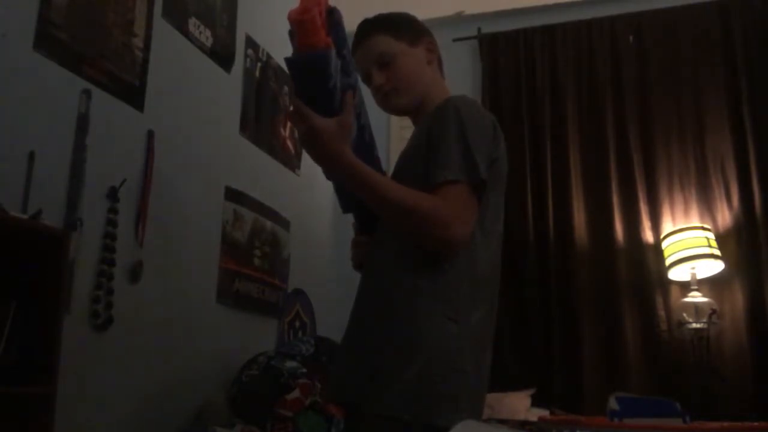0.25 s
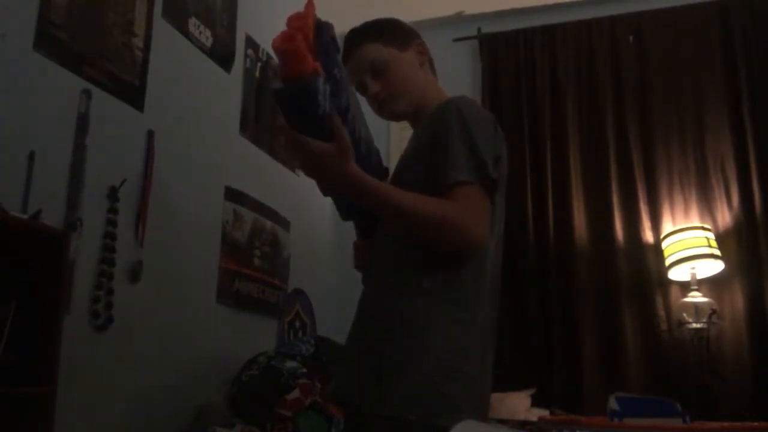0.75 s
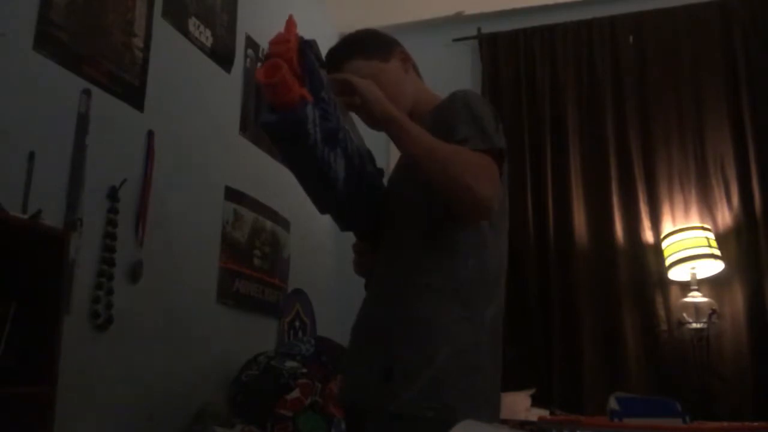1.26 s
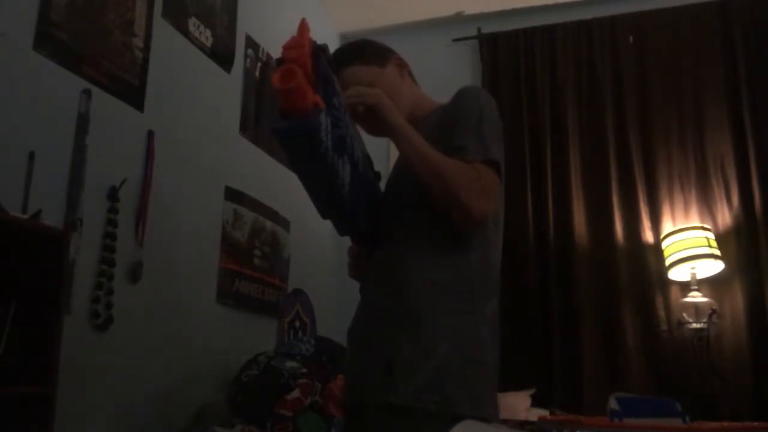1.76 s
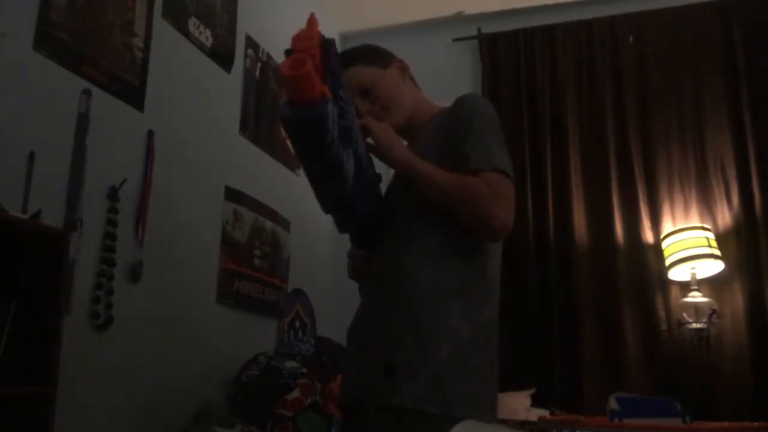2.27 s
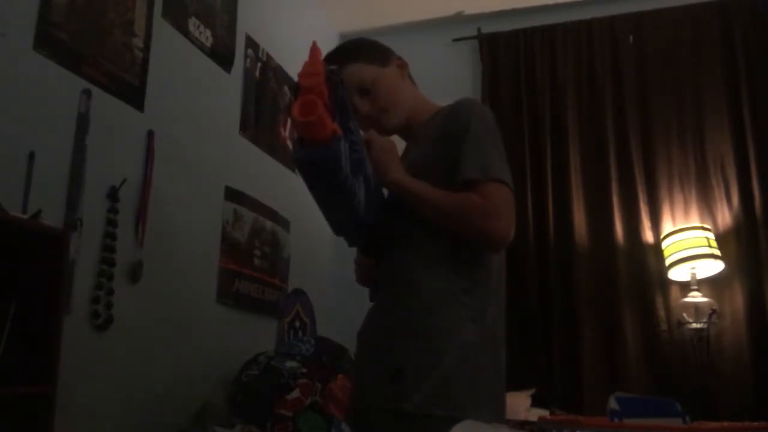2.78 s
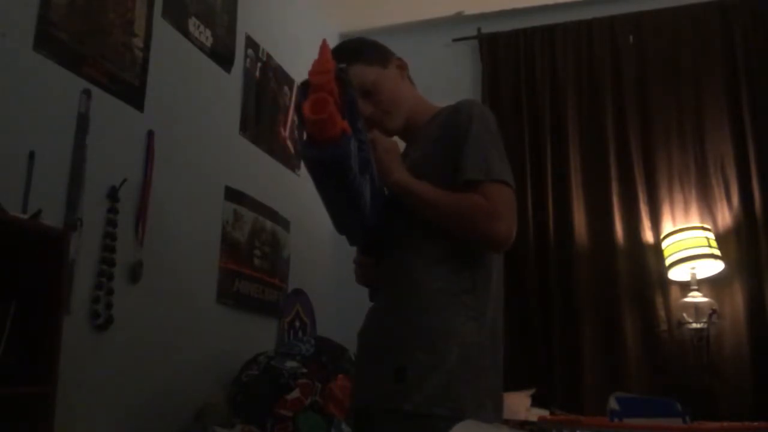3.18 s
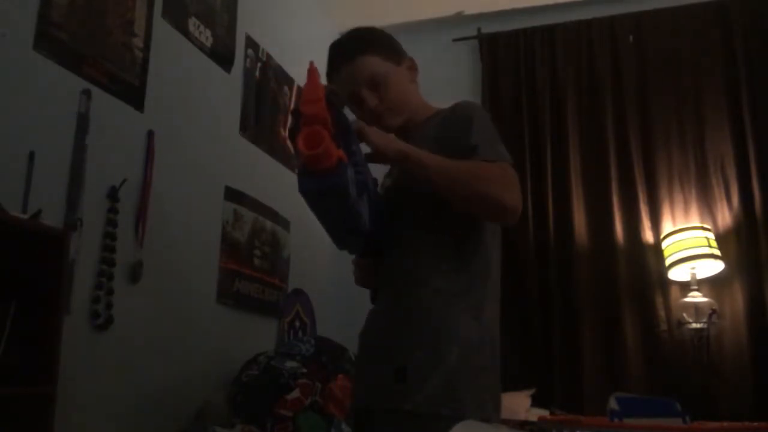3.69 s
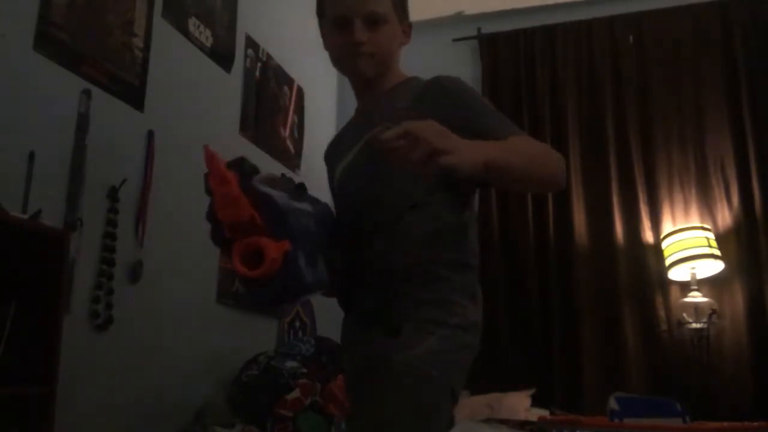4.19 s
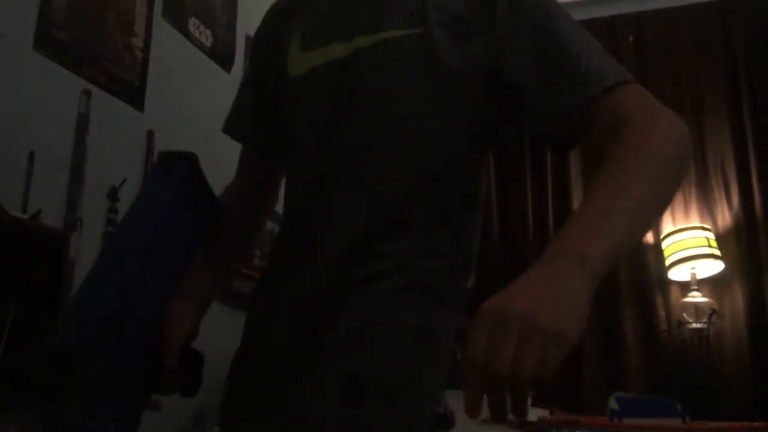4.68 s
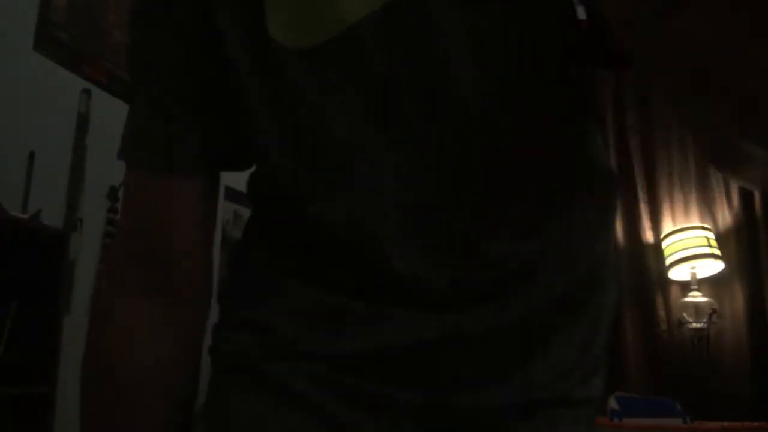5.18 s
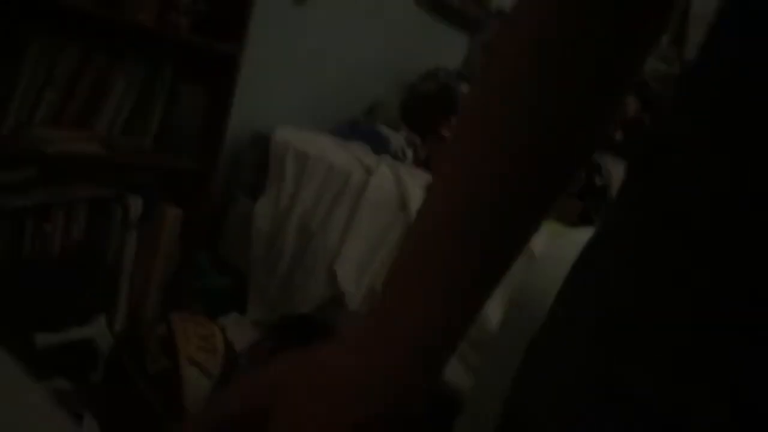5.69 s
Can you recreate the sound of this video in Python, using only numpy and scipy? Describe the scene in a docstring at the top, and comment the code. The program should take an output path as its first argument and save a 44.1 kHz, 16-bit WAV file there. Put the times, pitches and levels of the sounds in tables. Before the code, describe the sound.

A quiet bedroom opens with faint, muffled hiss, which brightens and gains a low hum at about 0.7 seconds. Soft ticks and rubbing follow as a plastic toy blaster is handled, then a sharp click at 1.8 seconds. Around 2 seconds its battery motor starts amid more clicks, rising in a hissy, whirring whine that swells by 2.5 seconds. A loud clack lands at 2.7 seconds, and gears grind with a fast throb from about 2.6 to 3.3 seconds. The power then cuts and the whine slowly falls in pitch, fading until about 5.5 seconds. Plastic knocks and soft footfalls on floorboards come near 4.3 seconds, with light rubbing and further knocks around 5.2 seconds. From 5.5 seconds a hand grips the microphone with loud, close, creaking snaps, then rustles and bumps it several times just before 5.9 seconds.

```python
"""Two flywheel motors in a battery toy blaster spin up and coast down in a quiet bedroom. Their whine is
a harmonic series on each shaft speed, joined by brush hiss, wheel roar and a loaded gear grinding.
Knocks and rubbing excite the resonances of the plastic shell, and feet shift on the floor boards.
At the end a hand creaks on a nearby camera by stick-slip friction, then bumps it.
Background hiss lies beneath; at first the sound is muffled, then the treble and a low hum enter."""
import sys
import numpy as np
from scipy import signal
from scipy.fft import rfft, irfft, next_fast_len
from scipy.io import wavfile
from scipy.ndimage import uniform_filter1d

SR = 44100
rng = np.random.default_rng(int(sys.argv[2]) if len(sys.argv) > 2 else 0)


def output_pcm(signal):
    """Save a mono or channel-first signal as 16-bit PCM at the path in sys.argv[1].

    Samples are clipped to [-1, 1] before scaling.
    """
    pcm = np.clip(np.atleast_2d(signal).T, -1, 1) * 32767
    wavfile.write(sys.argv[1], SR, np.round(pcm).astype(np.int16))


N = 262306
T = np.arange(N) / SR

# shaft harmonics: multiple of shaft speed, level/dB, slope/(dB per doubling of speed)
SHAFT_ORDERS = [(1, 5.5, 0.5), (2, -8, -5), (3, -0.5, 2), (4, -6.5, -0.5), (5, -11, -3), (6, -15, -1.5),
                (7, -7, 4), (9, -1, 7)]
# spectra of the brush hiss and the wheel roar: f/Hz, level/dB
HISS_SPECTRUM = [(1180, 5), (2000, 2.5), (2780, -10.5), (3280, -14), (4730, -2.5), (6420, -6), (9660, -4),
                 (10500, -4), (16000, 2)]
ROAR_SPECTRUM = [(150, -16), (250, -14), (382, -23), (450, -5), (595, 4.5), (1060, 4.5), (1210, 5.5),
                 (2500, -11.5), (3250, -37), (5500, -120)]
# resonances of the motor cans and the plastic shell: f/Hz, bandwidth/Hz, level/dB
CAN_MODES = [(3280, 400, -6), (4200, 600, -8), (5200, 350, -1), (6250, 500, 0), (7000, 600, -4),
             (9000, 1600, -11)]
SHELL_MODES = [(181.4, 80, -9), (280, 95, -3), (524, 145, 6), (659, 137, 7.5), (937, 257, 0.5),
               (1260, 220, 2.5), (1521, 233, -0.5), (2090, 250, -3), (2960, 540, -6.5), (4150, 610, -6),
               (5340, 170, -17), (6775, 460, -4.5), (6720, 830, -5.5), (8250, 1100, -68)]
# motor gain as the blaster is turned and carried: t/s, level/dB
CARRY_GAIN = [(2.2, -19), (2.45, -3.5), (2.8, 1.5), (3.3, -1.5), (4.3, -1), (4.75, -4), (5.05, -7),
              (5.45, -7)]
# knocks on the shell: t/s, level/dB, tilt/(dB per octave), rattle/dB, rattle length/s, thud/dB
SHELL_KNOCKS = [(0.766, -37.5, 0.5, -1, 0.019, -30), (0.829, -34, 7, -23, 0.019, -28),
                (0.91, -49, -1.5, -11, 0.052, -30), (1.035, -46, -1.5, -18, 0.028, -30),
                (1.07, -43, 0.6, -13, 0.061, -32), (1.131, -40, -0.2, -12, 0.018, -30),
                (1.326, -36, -3, -8.5, 0.03, -3), (1.513, -44.5, -4.5, -22, 0.018, -33),
                (1.627, -35, -14.5, -12.5, 0.02, -5), (1.771, -31, -6.5, 3, 0.077, -28),
                (1.783, -8.5, 2, 1, 0.012, -13.5), (1.961, -17, -3.5, 4.5, 0.054, -13),
                (2.142, -27.5, -2.5, 10, 0.027, -37), (2.159, -18, -2.5, -6, 0.025, -40),
                (2.228, -29.5, -2.5, -17, 0.034, -34), (2.305, -38, 2.5, -15, 0.011, -27),
                (2.377, -21, 2, -28, 0.014, -35), (2.483, -36.5, 0, -10, 0.013, -36),
                (2.59, -29.5, 0, -1, 0.013, -36), (2.65, -25.5, -4.5, -5, 0.019, -30),
                (2.675, -3.5, 0.8, 10, 0.0095, -21), (3.68, -34, -2, -11, 0.033, -22),
                (4.325, -21.5, -1.5, 15, 0.028, -4), (4.353, -22, -2.5, -7, 0.027, -16),
                (4.432, -31, 4, -4, 0.027, -20), (4.667, -34.5, -2, -13, 0.023, -8),
                (4.739, -45, 18, -14, 0.036, 9.5), (4.892, -36, 6, -16, 0.019, -30),
                (5.19, -23, -1, -3.5, 0.033, -12), (5.381, -32.5, 5, 10, 0.032, -24)]
# finger slips on the camera, and pushes that move its whole housing: t/s, level/dB
FINGER_SLIPS = [(5.4724, -15.5), (5.48, -21), (5.487, -29), (5.5068, -3), (5.5177, -7), (5.5254, -5),
                (5.5367, -12), (5.5385, -6), (5.5425, -11), (5.5515, -25), (5.5721, -0.5), (5.587, -4),
                (5.5958, -11), (5.6043, -15), (5.6134, -25), (5.6202, -18.5)]
HOUSING_PUSHES = [(5.506, -7), (5.5385, -15), (5.572, -18.5)]
# bright resonances and low body of the housing: f/Hz, bandwidth/Hz, level/dB
HOUSING_MODES = [(2960, 1540, -5.5), (4080, 1200, 0), (6200, 810, 1), (9600, 3200, -1.5), (12800, 4000, -1)]
BODY_MODE = [(1160, 2200, 0)]
# bumps on the camera: t/s, level/dB, contact time/s, crack/dB
CAMERA_BUMPS = [(5.47, -32, 0.0073, -62), (5.829, -42, 0.0018, -31.5), (5.852, -11, 0.00039, -13.5),
                (5.8565, -3, 0.0014, -46), (5.87, -12.5, 0.0017, -28), (5.883, -7, 0.0024, -33),
                (5.895, -14, 0.012, -62)]
# modes of the camera and its support: f/Hz, level/dB, T60/s
SUPPORT_MODES = [(56, -5, 0.12), (87, -1.5, 0.12), (106.5, 5, 0.12), (173.7, -2.5, 0.13),
                 (211, -1.5, 0.089), (285, 5, 0.079), (348, -2, 0.076), (500, -4, 0.07), (692, 1.5, 0.063),
                 (960, 1, .045), (1560, 2, 0.052), (2880, -13, .04)]
# envelope of the handling rustle: t/s, level/dB
RUSTLE_GAIN = [(5.4, -63), (5.474, -45), (5.706, -42), (5.85, -55.5)]
# spectrum of that rustle: f/Hz, level/dB
RUSTLE_SPECTRUM = [(30, -24), (60, -5), (290, -3), (600, -15.5), (3000, -28.5)]
# hands and cloth on the shell: start/s, end/s, level/dB, share of bright hiss
RUB_STROKES = [(0.652, 1.75, -70, .1), (2.187, 2.643, -55, .05), (4.294, 4.927, -57, .1),
               (5.205, 5.464, -54.5, 1)]
# feet on the boards: t/s, level/dB
STEPS = [(0.401, -47.5), (1.07, -48), (4.345, -23.5), (4.433, -33), (5.38, -40)]
# reverberation time of the bedroom: f/Hz, T60/s
ROOM_DECAY = [(200, 0.36), (530, 0.26), (1390, 0.32), (3680, 0.26), (9700, 0.3)]
# spectra of the room air and of the dull, quieter hiss of the muffled opening: f/Hz, level/dB
AIR_SPECTRUM = [(15, 12.5), (25, 12), (92, -2.5), (208, -6.5), (388, -7.5), (509, -37), (616, -7.5),
                (1470, -26), (4850, -28), (6190, -26), (10400, -23), (14400, -14.5), (16500, -16.5)]
MUFFLED_HISS_SPECTRUM = [(15, -3), (30, 3.5), (55, 0.5), (150, -10.5), (300, -21.5), (810, -17.5),
                         (1300, -22), (1900, -20), (2500, -29.5)]
# noise bands of a wavering hum: f/Hz, bandwidth/Hz, level/dB
HUM_BANDS = [(50.3, 14, -83), (89, 12, -57.5)]
# microphone response: f/Hz, level/dB
MIC_RESPONSE = [(4800, -0.5), (6300, 4), (9700, -1), (10500, -7), (13000, -8.5), (16000, -17)]

TRIGGER_S, RELEASE_S = 1.931, 3.34  # current flows between these times
FREE_HZ, FRICTION_HZ, CLIMB_S, COAST_S = 330, 20, 1.4, 1.84  # no-load speed, friction, time constants
REFERENCE_HZ, SPEED_RATIO = 160, .945  # shaft speed where level slopes pivot; slow wheel over fast
IDLE_ON_S, GEAR_ON_S, GEAR_OFF_S, GEAR_RISE_S, GEAR_FALL_S = 2.4, 2.583, 3.26, .089, .048
IDLE_DB, GEAR_DB, GEAR_DB_PER_S = -60.5, -32.5, 7
CHATTER_S, CHATTER_END_S, CHATTER_GAP_S, CHATTER_DB = 5.625, 5.653, .003, -23.5  # slips run together
SHUDDER_S, SHUDDER_DB, SHUDDER_HZ, SHUDDER_LENGTH_S = 5.564, -16, 245, .043
TREBLE_ON_S, MUFFLED_HZ, BAND_LIMIT_HZ = .659, 2400, 16150


def whine(shafts):
    """Forced vibration: fluttering harmonics of both flywheels drive the shell's resonances."""
    octaves = np.log2(shaft_speed() / REFERENCE_HZ)
    drive = np.zeros(N)
    for turns in shafts:
        for order, db, slope_db in SHAFT_ORDERS:
            gain = amp(db + slope_db * octaves + 3.1 * wander(18))
            drive += gain * np.cos(2 * np.pi * (order * turns + rng.random()))
    return motor_gain(db=-48.5, slope_db=.65) * (.15 * drive + resonate(drive, SHELL_MODES))


def whirr(shafts):
    """Sliding friction: brush hiss, blurred by sparking, rings the motor cans; the wheels roar below."""
    # the gliding orders stand clearest just after the current stops, then fade into noise
    clarity = np.interp(T, RELEASE_S + np.array([-.1, 0, .85, 1.35]), [.5, .75, .75, .4])
    scrape = unit_rms(sum(map(brush_scrape, shafts)))
    brushes = clarity * scrape + np.sqrt(1 - clarity ** 2) * 1.22 * rng.standard_normal(N)
    cans = unit_rms(resonate(brushes, CAN_MODES, sign=.81)) * amp(.5 * wander(33))
    hiss = .7 * unit_rms(filtered(HISS_SPECTRUM, brushes)) + .6 * cans
    roar = coloured_noise(ROAR_SPECTRUM) * amp(.43 * wander(22))
    return (motor_gain(db=-44.5, slope_db=10.7) * hiss
            + motor_gain(db=-48.5, slope_db=-.5, powered_db=3.1) * roar)


def brush_scrape(turns):
    """Periodic excitation: a rough track repeats each turn; three commutator gaps lift every third order."""
    orders = np.arange(129)
    order_db = 5 * (orders % 3 == 0) + 3 * rng.standard_normal(129) - .3 * np.maximum(orders - 45, 0)
    tracks = irfft(amp(order_db) * (orders > 14) * np.exp(2j * np.pi * rng.random((2, 129))))
    lean = 1.8 * wander(7)  # two contact points share the load, so single orders come and go
    near, far = (np.interp(turns, np.arange(256) / 256, track, period=1) for track in tracks)
    return np.cos(lean) * near + np.sin(lean) * far


def shaft_speed():
    """First-order lag: the faster wheel's speed/Hz climbs, then decays by air drag and bearing friction."""
    climb = FREE_HZ * (1 - np.exp(-(np.clip(T, TRIGGER_S, RELEASE_S) - TRIGGER_S) / CLIMB_S))
    coast = (climb + FRICTION_HZ) * np.exp(-np.maximum(T - RELEASE_S, 0) / COAST_S) - FRICTION_HZ
    return np.maximum(coast, 1)


def shaft_turns():
    """Rotation is the integral of speed; inertia keeps each flywheel's jitter small."""
    return [np.cumsum(share * shaft_speed() * (1 + .000916 * wander(14.2))) / SR
            for share in (1, SPEED_RATIO)]


def motor_gain(db, slope_db, powered_db=0):
    """Power law: slope_db per doubling of speed, offset by the current and by how the blaster is held."""
    current = np.clip((RELEASE_S - T) / .08, 0, 1)
    octaves = np.log2(shaft_speed() / REFERENCE_HZ)
    return envelope(CARRY_GAIN) * amp(db + slope_db * octaves + powered_db * current)


def gear_grind(strikes_per_s=3000, throb_hz=9.6):
    """Shot noise: random tooth strikes ring the shell, throb with the slow gear and grow under load."""
    strikes = rng.standard_normal(N) * (rng.random(N) < strikes_per_s / SR)
    throb = amp(1.8 * np.cos(2 * np.pi * throb_hz * (T - 2.92)) + .7 * wander(40))
    loaded_s = GEAR_ON_S + GEAR_RISE_S
    top_db = GEAR_DB + GEAR_DB_PER_S * (GEAR_OFF_S - loaded_s)
    load = envelope([(IDLE_ON_S, IDLE_DB), (GEAR_ON_S, IDLE_DB), (loaded_s, GEAR_DB),
                     (GEAR_OFF_S, top_db), (GEAR_OFF_S + GEAR_FALL_S, IDLE_DB)])
    return load * throb * unit_rms(resonate(strikes, SHELL_MODES))


def knocks():
    """Impact excitation: a tick and a rattle ring the shell while the hand thuds on the hollow stock."""
    out, t = np.zeros(N), T[:8192]
    hz = np.fft.rfftfreq(len(t), 1 / SR)
    octaves = np.log2((hz + 300) / 1000)
    radiation = 1 - np.exp(-(hz / 200) ** 4)  # a small shell radiates no bass
    tick = 2.2 * np.exp(-(t / .00003 - 30) ** 2)
    stock = thud(hz=290.3, decay_s=.0098)
    for s, db, tilt_db, rattle_db, length_s, thud_db in SHELL_KNOCKS:
        shake = 1.44 * np.exp(-t / .002) + amp(rattle_db) * np.exp(-(t / length_s) ** 2)
        rattle = rng.standard_normal(len(t)) * (1 - np.exp(-t / .0012)) * shake
        force = clack(rattle + tick, length_s)
        shell = resonate(force, SHELL_MODES) + .17 * force
        radiated = irfft(rfft(shell) * amp(tilt_db * octaves) * radiation)
        add(out, s, amp(db) * (unit_peak(radiated) + amp(thud_db) * stock))
    return out


def clack(rattle, length_s):
    """Spectral smoothing: with its chance peaks evened out, a rattle clacks and does not ring."""
    spectrum = rfft(rattle)
    evening = (uniform_filter1d(abs(spectrum), size=120) / (abs(spectrum) + 1e-9)) ** .6
    return irfft(spectrum * evening) * np.exp(-(T[:len(rattle)] / (2.5 * length_s + .006)) ** 4)


def creak():
    """Stick-slip friction: a finger releases in brief snaps, and the housing shudders under the grip."""
    out, t = np.zeros(N), T[:600]
    chatter_s = np.arange(CHATTER_S, CHATTER_END_S, CHATTER_GAP_S)
    lateness, strength = rng.standard_normal((len(chatter_s), 2)).T
    chatter = np.c_[chatter_s + .3 * CHATTER_GAP_S * lateness, CHATTER_DB + 4 * strength]
    body = unit_peak(resonate(np.exp(-(t / .0001 - 6) ** 2), BODY_MODE))
    for s, db in np.r_[FINGER_SLIPS, chatter]:
        burst = rng.standard_normal(len(t)) * t * np.exp(-t / .00034)
        snap = bandpass(resonate(burst, HOUSING_MODES), hz=6600, width_hz=21120)
        add(out, s - .0008, amp(db) * (unit_peak(snap) + amp(-26) * body))
    for s, db in HOUSING_PUSHES:
        add(out, s, amp(db) * body)
    n = round(SHUDDER_LENGTH_S * SR)
    shudder = np.sin(2 * np.pi * SHUDDER_HZ * T[:n] + .8 * wander(90)[:n])
    add(out, SHUDDER_S, amp(SHUDDER_DB) * signal.windows.tukey(n, .6) * shudder)
    return out


def bumps():
    """Modal response: soft blows ring the camera's support, hard ones also crack, and the hand rustles."""
    out, t = np.zeros(N), T[:SR // 4]
    modes = sum(amp(db - 60 * t / t60) * np.sin(2 * np.pi * hz * t) for hz, db, t60 in SUPPORT_MODES)
    crack_decay = np.exp(-t / .011) + .4 * np.exp(-t / .035)
    for s, db, contact_s, crack_db in CAMERA_BUMPS:
        blow = np.sin(np.pi * np.clip(t[:800] / contact_s, 0, 1)) ** 2
        crack = signal.lfilter([1], [1, -.6], rng.standard_normal(len(t))) * crack_decay
        add(out, s, .5 * amp(db) * np.convolve(modes, blow / blow.sum()))
        add(out, s, .5 * amp(crack_db) * crack)
    rustle = coloured_noise(RUSTLE_SPECTRUM) * amp(1.3 * wander(30))
    return out + envelope(RUSTLE_GAIN) * rustle


def rubbing(grains_per_s=600):
    """Friction noise: uneven grains excite the shell, and cloth adds a bright hiss."""
    grains = rng.standard_normal(N) * (.12 + 4 * (rng.random(N) < grains_per_s / SR))
    grains *= amp(1.95 * wander(17))
    shell = unit_rms(resonate(grains, SHELL_MODES))
    cloth = unit_rms(np.diff(grains, prepend=0))
    out = np.zeros(N)
    for start, end, db, share in RUB_STROKES:
        stroke = (shell + share * cloth)[round(start * SR):round(end * SR)]
        add(out, start, amp(db) * signal.windows.tukey(len(stroke), .64) * stroke)
    return out


def footfalls():
    """Free vibration: shifting feet excite one low mode of the floor boards."""
    out = np.zeros(N)
    for s, db in STEPS:
        add(out, s, amp(db) * thud(hz=89.3, decay_s=.022))
    return out


def bedroom(x):
    """Reverberation: sparse echoes of random sign, each band decaying at its own rate."""
    taps = np.zeros(SR // 2)
    slots = np.arange(160, len(taps) - 20, 20)
    taps[slots + rng.integers(0, 20, len(slots))] = 1
    taps *= rng.choice([-1., 1.], len(taps))
    hz, t, bands = signal.stft(taps, SR, nperseg=256)
    decay = amp(-60 * t / at_frequency(ROOM_DECAY, hz)[:, None])
    tail = signal.istft(bands * decay, SR, nperseg=256)[1]
    return signal.fftconvolve(x, tail / np.linalg.norm(tail))[:N]


def background():
    """Noise floor: background hiss, dull and quieter at first, then joined by a narrow-band hum."""
    hum = sum(amp(db) * unit_rms(bandpass(rng.standard_normal(N), hz, width))
              for hz, width, db in HUM_BANDS)
    full = amp(-55 + 1.9 * wander(30)) * coloured_noise(AIR_SPECTRUM) + hum
    return np.where(T > TREBLE_ON_S, full, amp(-59) * coloured_noise(MUFFLED_HISS_SPECTRUM))


def thud(hz, decay_s):
    """Damped oscillator with a soft onset."""
    t = T[:8192]
    return np.sin(2 * np.pi * hz * t) * (1 - np.exp(-t / .0011)) * np.exp(-t / decay_s)


def resonate(x, modes, sign=-1):
    """Modal superposition: resonance k is weighted by sign ** k."""
    return sum(sign ** k * amp(db) * bandpass(x, hz, width) for k, (hz, width, db) in enumerate(modes))


def wander(cutoff_hz):
    """Random modulation: low-passed noise of unit rms."""
    lowpass = signal.butter(2, cutoff_hz, fs=SR / 32, output="sos")
    slow = signal.sosfiltfilt(lowpass, rng.standard_normal(N // 32 + 2))
    return np.interp(T, np.arange(len(slow)) * 32 / SR, unit_rms(slow))


def envelope(points):
    """Amplitude envelope through (t/s, level/dB) points, silent outside them."""
    s, db = np.transpose(points)
    return amp(np.interp(T, np.r_[s[0] - .05, s, s[-1] + .05], np.r_[-120, db, -120]))


def filtered(points, x):
    """Zero-phase filtering through (f/Hz, level/dB) points."""
    size = next_fast_len(N)
    gain = amp(at_frequency(points, np.fft.rfftfreq(size, 1 / SR)))
    return irfft(rfft(x, size) * gain, size)[..., :N]


def coloured_noise(spectrum):
    return unit_rms(filtered(spectrum, rng.standard_normal(N)))


def at_frequency(points, hz):
    f, value = np.transpose(points)
    return np.interp(np.log(hz + 1), np.log(f + 1), value)


def bandpass(x, hz, width_hz):
    return signal.lfilter(*signal.iirpeak(hz, hz / width_hz, SR), x)


def below(x, hz):
    return signal.oaconvolve(x, signal.firwin(1023, hz, window=("kaiser", 9), fs=SR)[None], "same")


def amp(db):
    return 10 ** (np.asarray(db) / 20)


def unit_rms(x):
    return x / np.sqrt(np.mean(x ** 2) + 1e-20)


def unit_peak(x):
    return x / abs(x).max()


def add(mix, s, sound):
    part = mix[round(s * SR):][:len(sound)]
    part += sound[:len(part)]


def scene():
    """Superposition of direct sound, reverberation and hiss; the close camera sounds stay nearly dry."""
    shafts = shaft_turns()
    clatter = knocks() + gear_grind() + footfalls() + rubbing()
    motors = whine(shafts)
    near = creak() + bumps()
    echoes = bedroom(amp(-4) * (motors + clatter) + amp(-21) * near)
    return (motors + whirr(shafts) + clatter + near + echoes + background())[None]


def record(dry):
    """Filters in cascade: bass cut, microphone response, a muffled opening and the band limit."""
    bass_cut = signal.lfilter(*signal.butter(3, 38, "high", fs=SR), dry)
    heard = filtered(MIC_RESPONSE, bass_cut)
    muffled = below(heard * (T <= TREBLE_ON_S), MUFFLED_HZ)
    return below(np.where(T > TREBLE_ON_S, heard, muffled), BAND_LIMIT_HZ)


dry = scene()
out = record(dry)
output_pcm(out)
```